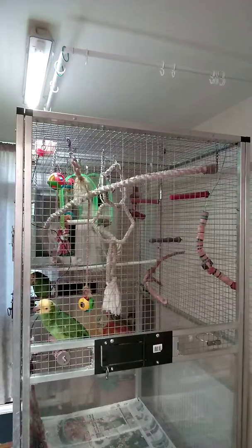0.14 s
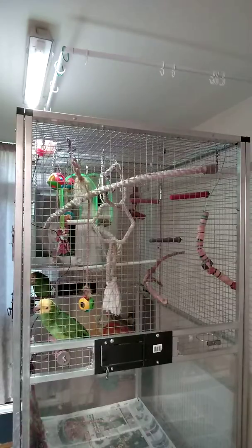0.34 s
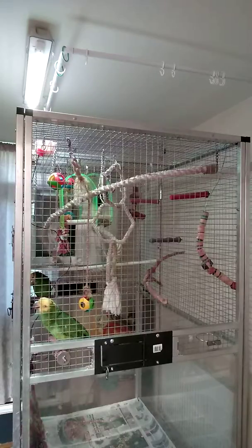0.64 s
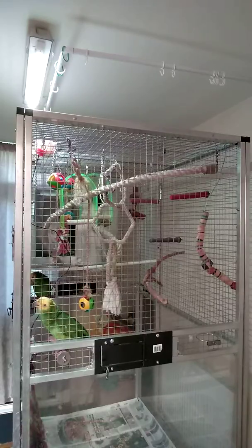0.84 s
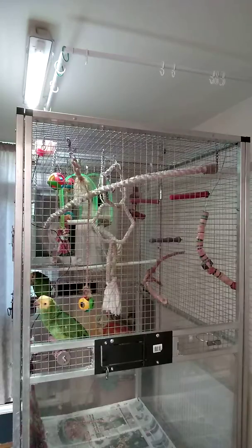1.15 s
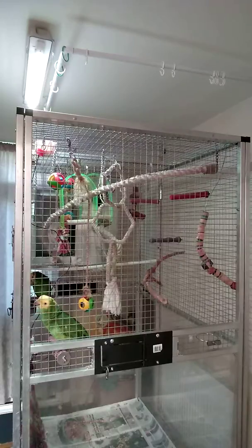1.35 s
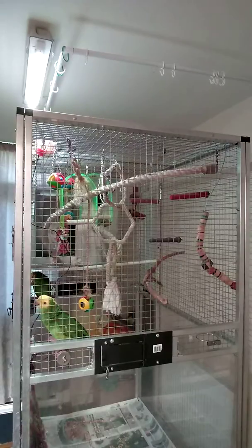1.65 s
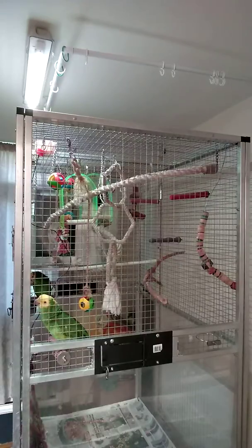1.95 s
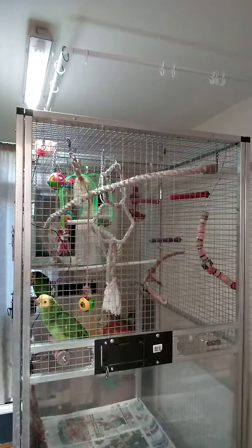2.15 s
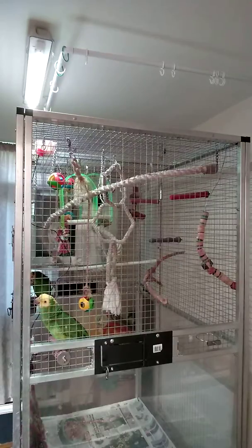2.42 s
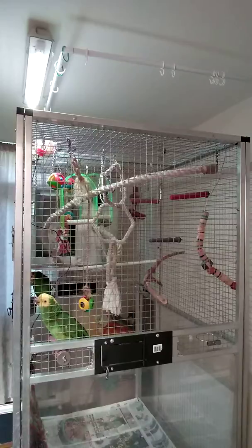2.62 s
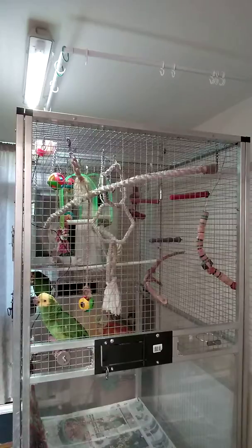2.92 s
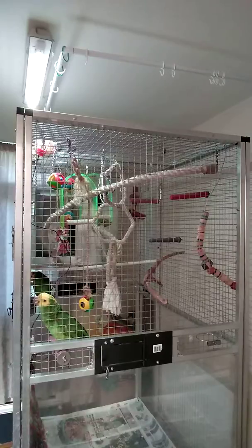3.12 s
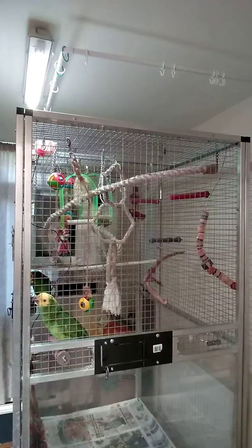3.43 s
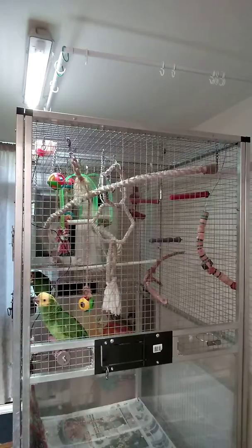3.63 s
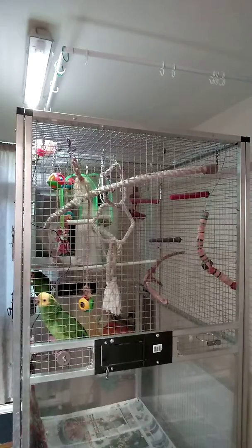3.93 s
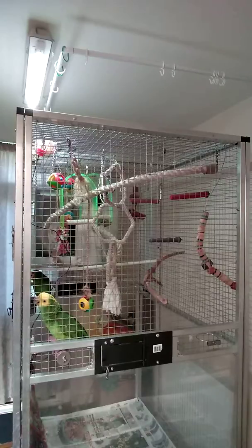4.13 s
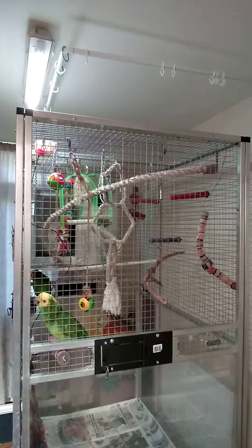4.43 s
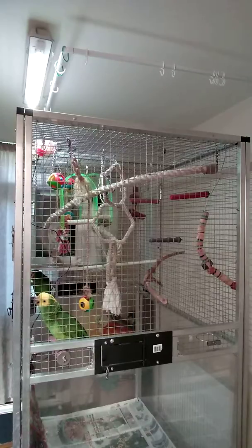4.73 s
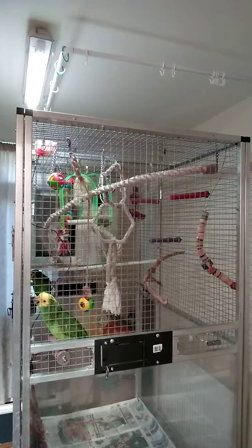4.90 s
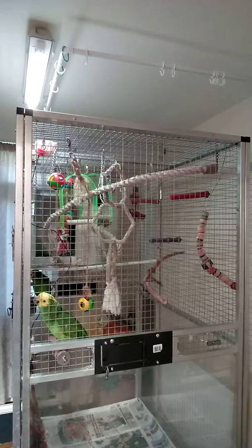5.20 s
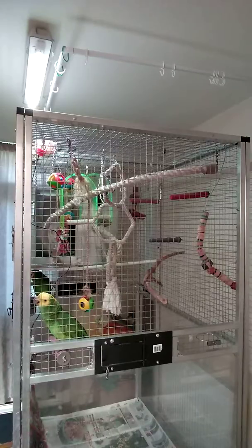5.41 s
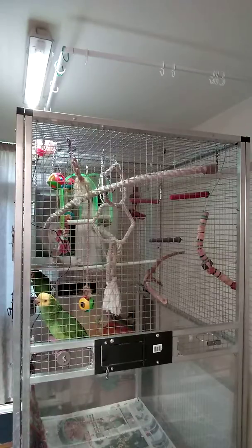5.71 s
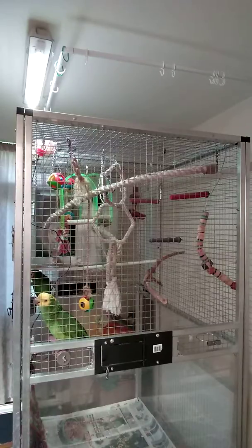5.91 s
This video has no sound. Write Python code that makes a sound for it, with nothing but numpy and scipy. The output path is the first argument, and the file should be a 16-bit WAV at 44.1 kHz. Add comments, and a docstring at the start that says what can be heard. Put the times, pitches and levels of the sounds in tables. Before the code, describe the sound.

Harsh, gliding parrot calls close to the microphone, sparse at first, then crowded and overlapping, ringing briefly off hard indoor walls.

```python
"""Two parrots in a small bare room

Two parrots squawk over each other, close to the microphone, with a clack, faint whistles and a thin hiss.
Each call is a train of syrinx pulses and turbulence, coloured by a throat and beak whose resonances move.
The clack is ringing noise, the whistles are wavering sines and the hiss is noise in narrow bands.
The room smears the glides, and a limiter holds the level nearly flat over steady coloured noise."""
import sys
import numpy as np
from scipy import signal
from scipy.fft import rfft, irfft
from scipy.io import wavfile
from scipy.ndimage import uniform_filter1d

SR = 44100
rng = np.random.default_rng(int(sys.argv[2]) if len(sys.argv) > 2 else 0)


def master(y):
    """Save y as 16-bit WAV."""
    cut = np.clip(np.atleast_2d(y).T, -1, 1)
    pcm = np.round(cut * 32767)  # scale
    wavfile.write(sys.argv[1], SR, pcm.astype(np.int16))


N = 267334

# The calls of the birds. Each row: depth of the every-third-pulse pattern, base roughness from 0 to 1,
# pitch factor of the final plunge, throat in Hz at mean pitch, throat width in Hz, beak in Hz at mean pitch,
# beak width in Hz, chest level in dB, palate level in dB, treble tilt in dB per octave, and a contour.
# Each contour row: time in seconds, pitch in Hz before the plunge, effort in dB, beak level in dB,
# treble level in dB.
CALLS = [ (0.74, 0.34, .79, 1320, 830, 2620, 1700, -22.5, -1, 6, [(0.0, 703.6, 5.5, -5, -8),
         (.034, 660, -9.5, -19, -11), (.068, 671, -5.5, -11, -14), (.1, 664, -28, -8, -15)]),
         (0.23, 0.086, 1, 1620, 960, 2900, 1400, -35, 7.5, 5.5, [(.04, 524.3, -10, -9, -6.5),
         (.11, 537.8, -14, -9, -5.5), (.222, 556, -9.5, -14, -2.5), (.272, 557, -18, 5, -4),
         (.3, 521, -4, 16, -6)]),
         (0.92, 0.217, .9, 1486, 1330, 2660, 1530, -15.5, -2, -0.5, [(.25, 556.5, -6, -20, -12),
         (.284, 515, -16, 2, -3), (.335, 583, -12.5, 2.5, -4), (.454, 574.6, -17.5, 6.5, -5),
         (.586, 564.6, -20, 0.5, -2), (.752, 591, -20.5, -1, -5), (.822, 617.5, -16, -11, -7),
         (.87, 539, -14.5, -24, -11), (.94, 381.6, -25, -2, -9.5)]),
         (.097, 0.113, 0.92, 1360, 934, 2460, 990, -54, 12.5, 6.5, [(1.175, 339.7, -21, 0.5, -14),
         (1.211, 398, -25.5, -5.5, -9.5), (1.301, 432.1, -25, -8, -10.5), (1.43, 444.6, -23, -3.5, -9.5),
         (1.58, 464.7, -13, -5, -12), (1.63, 484.2, -13, -3, -4.5), (1.74, 470.3, -13, -5, -4.5),
         (1.773, 428.5, -13, -1.5, -5.5), (1.837, 330, -21, -0.5, -7), (1.86, 325, -45, 14, -16)]),
         (0.23, 0.041, 0.98, 1346, 1100, 2330, 1100, -27, 14, 6, [(2.258, 380, -27.5, -6, -12),
         (2.306, 421.4, -27.5, -4, -11), (2.46, 449.4, -24, -2.5, -7), (2.56, 425.4, -20, -3, -15.5),
         (2.632, 393.6, -26, -16, -18), (2.734, 498.2, -15, 1.5, -0.5), (2.836, 505.2, -17.5, 0.5, -0.5),
         (2.906, 446, -13, 0.5, -9.5), (2.97, 442.6, -16.5, 16, -4)]),
         (1.8, 0.89, 1, 1300, 910, 2400, 2600, -15, 11, 1.5, [(2.48, 726, -27, -10, -14),
         (2.56, 713, -19.5, -7, -14.5), (2.68, 724, -19, -8, -8.5)]),
         (1.15, 0.706, .58, 1290, 790, 2520, 1440, -9.5, 3.5, -7.5, [(2.82, 619.6, -25, -22, -3),
         (2.854, 741.5, -11.5, 2.5, -4), (3.018, 718, -21.5, 9, -7.5), (3.05, 719, -16, -19, -23)]),
         (1.64, 0.39, 0.96, 834, 244, 2470, 1340, -31, 2, -7, [(3.08, 552, -26, 0, -5),
         (3.119, 556.2, -16.5, 3.5, -7), (3.153, 576.3, -22, 17, -2), (3.21, 576, -27, 16, -4)]),
         (1.2, 0.98, 1, 1230, 580, 2600, 1200, -21, -8, -4, [(3.292, 770, -10, -18, -18),
         (3.302, 695, 1.5, -28, -20), (3.325, 620, -21, -21, -15), (3.36, 615, -17, -19, -18)]),
         (0.77, 0.28, .9, 1105, 330, 2540, 540, -11, 1, 6, [(3.355, 559, -10, -25, -15),
         (3.379, 550.2, -4, -21.5, -13.5), (3.467, 547.3, -11, -2.5, -8.5), (3.54, 545, -17, -4, -4)]),
         (0.68, .85, 0.71, 1154, 395, 2540, 1600, -65, 8, -2.5, [(3.44, 550.8, -21, -8, -8),
         (3.51, 555, -6, -5.5, -10), (3.592, 569.6, -11, -5.5, -6.5), (3.808, 564.3, -14, -2, -3),
         (3.854, 519, -22.5, 4.5, -8), (3.9, 452, -20, -12, -3)]),
         (0.59, 0.352, 0.8, 1820, 1500, 2490, 1100, -5.5, 5, -3, [(3.93, 786, -14, -2, -11),
         (3.962, 805, -21.5, 2, -10), (3.975, 912.5, -14, 10, -8), (4.032, 901.5, -20, 10, -1),
         (4.12, 888, -23, 2, -7)]),
         (0.11, .06, .94, 1100, 2600, 2440, 940, 0.5, 5, -5.5, [(4.215, 720, -18, 9, -14),
         (4.239, 609.6, -15, 2, -4.5), (4.309, 727.6, -22.5, 8, -6.5), (4.343, 475, -12, 12, -6.5),
         (4.36, 486, -12, 18, -20)]),
         (0.14, 0.069, .94, 1300, 900, 2340, 980, 1, 1.5, -3.5, [(4.51, 660, -8, 7, -30),
         (4.526, 573.5, -14, 14.5, -11.5), (4.62, 714, -13.5, 8, -2.5), (4.642, 531.7, -11.5, 16.5, -0.5),
         (4.66, 478, -4, -3, -9)]),
         (0.35, 0.033, 0.78, 1350, 910, 2120, 1040, -10, 6, 5, [(4.675, 590, -19, -2, -12),
         (4.75, 684, -19, -1.5, -0.5), (4.79, 765, -31, -14, -2), (4.82, 755, -48, -12, -18)]),
         (0.013, 0.032, .7, 1870, 1690, 2620, 940, -12, -18, -1.5, [(4.822, 733, -17, -8, -8),
         (4.832, 704, -11, -2, -5.5), (4.858, 583.6, -9.5, 8, -7.5), (4.918, 530.8, -14, -2, -21),
         (5.014, 641.5, -10, 2.5, -8), (5.108, 627.5, -21.5, 3, 3.5), (5.146, 595.2, -9, -1, -13),
         (5.214, 610.4, -15, 0, -7.5), (5.276, 645.4, -11.5, -3.5, -7), (5.342, 666.6, -13.5, -1.5, -9),
         (5.476, 604, -15.5, -25, -8), (5.5, 591, -3, 9.5, -16)]),
         (0, 0.067, .78, 1590, 980, 3200, 2600, -17.5, 0, 5, [(4.86, 737, -9, -20, 2.5),
         (4.914, 670, -14, 4, -7.5), (4.982, 730, -15.5, -10, -2), (5.092, 738, -16.5, -11, -5),
         (5.13, 654, 1, -19, -16)]),
         (0, 0.22, 0.98, 1180, 990, 3220, 1030, -23, 7, 5.5, [(5.746, 510.7, -6.5, -11, -28),
         (5.767, 450, -23.5, -2, -2), (5.8, 432, -40, -9, -1)]),
         (0.56, 0.63, 1, 1390, 1480, 2920, 1300, -8.5, 6.5, 5.5, [(5.922, 496, -34, -17, -26),
         (5.94, 472, -8.5, -7, -10.5), (5.968, 492.5, -14, -3.5, -8), (6.062, 417, -10, -5, -12.5)]), ]
# Beak clacks. Each row: start in seconds, level in dB, ring in Hz.
BEAK_CLACKS = [(4.032, -10.5, 755)]
# Faint whistles in the pauses. Each row: start in seconds, length in seconds, mean pitch in Hz, level in dB.
FAINT_WHISTLES = [(1.035, 0.11, 2240, -47), (2.015, 0.099, 1707, -61), (2.15, 0.11, 2230, -69)]
# Windpipe overtones. Each row: centre in Hz, width in Hz, level in dB before the tilt of the call.
WINDPIPE_OVERTONES = [(5280, 1700, 2.5), (6536, 1100, 4.5), (7370, 1900, 0.5), (9840, 2500, -10.5),
                      (11600, 2100, -13.5), (14400, 5900, -21)]
# Bands of the thin hiss. Each row: centre in Hz, width in Hz, relative level in dB.
THIN_HISS_BANDS = [(6250, 300, -8), (7400, 410, 8), (8350, 350, 17), (9500, 680, 11), (10650, 480, 9)]
# Decay of the room. Each row: frequency in Hz, time to fall by 60 dB in seconds.
ROOM_DECAY = [(250, 0.34), (660, 0.38), (1740, 0.3), (4590, 0.27), (12000, 0.28)]
# Spectrum of room and microphone noise. Each row: frequency in Hz, relative density in dB per Hz.
NOISE_SPECTRUM = [(25, -14), (150, -23), (230, -8.5), (390, -3), (700, -9), (2250, -8.5), (4900, -21),
                  (15500, -25)]

CHEST_HZ, CHEST_WIDTH_HZ = 724, 572  # low resonance under the throat
PALATE_HZ, PALATE_WIDTH_HZ = 3670, 1150  # resonance between beak and windpipe overtones
THROAT_FOLLOW, BEAK_FOLLOW = 0.65, 0.46  # exponents by which the resonances ride with the pitch
PULSE_TOP_HZ = 8200  # above this the pulse harmonics fade
PLUNGE_S = .035  # the folds slacken as a call ends
ATTACK_S, RELEASE_S = 0.013, .015
ROUGH_PER_SAG = .35  # roughness gained as the pitch sags below the top of the call
ROUGH_PER_DB, FIRM_DB = .008, -15  # roughness gained per dB of effort below a firm voice
HISS_PEAK_S, HISS_DB, HISS_RISE_DB_PER_S, HISS_FALL_DB_PER_S = 2.124, -58, 130, 350
ROOM_DB = 2  # reverberant gain relative to the direct sound
NOISE_DB = -53.5  # rms level of the noise ahead of the limiter
EDGE_HZ = 15680  # upper band limit


def amp(db):
    """Level: the amplitude ratio is ten to the power of dB / 20."""
    return 10 ** (np.asarray(db) / 20)


def evened(x):
    """Normalization: division by the rms brings the mean power to 1."""
    return x / np.sqrt(np.mean(x ** 2) + 1e-20)


def steadied(x, size=1500):
    """Running normalization: division by a moving rms holds the short-term power near 1."""
    return x / np.sqrt(uniform_filter1d(x ** 2, size, mode="reflect") + 1e-12)


def read(points, hz):
    """Interpolation: values are joined by straight lines on a log-frequency axis."""
    f, value = np.transpose(points)
    return np.interp(np.log(hz + 1), np.log(f + 1), value)


def add(mix, s, sound):
    """Superposition: a sound is summed into the mix at s seconds."""
    part = mix[max(round(s * SR), 0):][:len(sound)]
    part += sound[:len(part)]


def resonate(x, hz, width, count=1):
    """Heterodyne resonance: the curve hz is shifted to zero, smoothed count times and shifted back."""
    turn = np.exp(2j * np.pi * np.cumsum(hz * np.ones(len(x))) / SR)
    r = np.exp(-np.pi * width / SR)
    z = x / turn
    for _ in range(count):
        z = signal.lfilter([1 - r], [1, -r], z)
    return 2 * (turn * z).real


def ring(x, hz, width):
    """Fixed resonance: a two-pole peak filter has gain 1 at its centre."""
    return signal.lfilter(*signal.iirpeak(hz, hz / width, SR), x)


def syrinx(hz, rough, third):
    """Source excitation: jittered harmonic pulses and gated turbulence share the drive by roughness."""
    wobble, breath, grip = rng.standard_normal((len(hz), 3)).T
    jitter = (0.0015 + 0.0402 * rough) * evened(uniform_filter1d(wobble, size=200))
    slow_waver = uniform_filter1d(uniform_filter1d(grip, size=1500), size=1500)
    jitter += 0.01497 * rough * evened(slow_waver)
    turns = np.cumsum(hz * (1 + jitter)) / SR

    pulses = sum(np.cos(2 * np.pi * k * turns) / (1 + (k * hz / PULSE_TOP_HZ) ** 4) for k in range(1, 28))
    pulses = pulses * (1 + third * np.cos(2 * np.pi * turns / 3 + 1))
    # a rough voice catches and slips
    pulses = pulses * amp(6.2 * rough * evened(uniform_filter1d(grip, size=400)))

    # turbulence bursts at each opening and comes in rasping clumps
    puffs = (1.4 + np.exp(-(turns % 1) / 0.12)) * breath
    puffs *= amp(7.9 * evened(uniform_filter1d(wobble, size=350)))
    drive = np.sqrt(1 - rough ** 2) * evened(pulses) + rough * evened(puffs)
    airy = drive + (0.037 + 2.0 * rough) * evened(puffs)  # extra turbulence for the treble
    return drive, airy


def windpipe(airy, palate_db, tilt_db):
    """Modal superposition: palate and windpipe resonances add with alternating signs."""
    modes = [(PALATE_HZ, PALATE_WIDTH_HZ, palate_db)]
    lowest_hz = WINDPIPE_OVERTONES[0][0]
    for hz, width, db in WINDPIPE_OVERTONES:
        modes.append((hz, width, db + tilt_db * np.log2(hz / lowest_hz)))
    return sum((-1) ** k * amp(db) * ring(ring(airy, f, w), f, w) for k, (f, w, db) in enumerate(modes))


def squawk(third, rough, plunge, throat_hz, throat_width_hz, beak_hz, beak_width_hz,
           chest_db, palate_db, tilt_db, rows):
    """Source and filter: syrinx drive passes a moving throat and beak, a fixed chest and a windpipe."""
    s, *columns = np.transpose(rows)
    t = np.arange(s[0], s[-1], 1 / SR)
    hz, effort_db, beak_db, treble_db = (np.interp(t, s, c) for c in columns)
    relative_pitch = hz / hz.mean()
    throat_hz = throat_hz * relative_pitch ** THROAT_FOLLOW
    beak_hz = beak_hz * relative_pitch ** BEAK_FOLLOW

    slack = np.clip(1 - (s[-1] - t) / PLUNGE_S, 0, 1) * (1 - min(plunge, 1))
    sag = 1 - hz / hz.max()
    weakness_db = np.clip(FIRM_DB - effort_db, 0, 15)
    rough = np.clip(rough + ROUGH_PER_SAG * sag + ROUGH_PER_DB * weakness_db + slack, 0, 1)
    drive, airy = syrinx(hz * (1 - slack), rough, third)

    throat = steadied(resonate(drive, throat_hz, throat_width_hz, count=3))
    chest = amp(chest_db) * steadied(resonate(drive, CHEST_HZ, CHEST_WIDTH_HZ, count=3))
    beak = amp(beak_db) * steadied(resonate(drive, beak_hz, beak_width_hz, count=3))
    treble = amp(treble_db) * steadied(windpipe(airy, palate_db, tilt_db))
    voice = steadied(throat - chest - beak) + treble
    edges = np.clip(np.minimum((t - s[0]) / ATTACK_S, (s[-1] - t) / RELEASE_S), 0, 1)
    return s[0], amp(effort_db) * edges * voice


def clack(s, level_db, hz):
    """Impact and free decay: a short band of noise dies away beside a decaying hollow ring."""
    t = np.arange(round(.03 * SR)) / SR
    noise = ring(ring(rng.standard_normal(len(t)), 1570, 2100), 1700, 2200)
    tick = evened(noise) * np.exp(-t / 0.0057)
    hollow = np.sin(2 * np.pi * hz * t) * np.exp(-t / 0.0037)
    return s, amp(level_db) * (2.66 * tick + hollow)


def whistle(s, length, hz, level_db):
    """Frequency modulation: smoothed noise wavers a sine slightly, and its ends are soft."""
    t = np.arange(0, length, 1 / SR)
    waver = 1 + 0.01 * evened(uniform_filter1d(rng.standard_normal(len(t)), size=600))
    tone = np.sin(2 * np.pi * np.cumsum(hz * waver) / SR)
    return s, amp(level_db) * tone * signal.windows.tukey(len(t), .6)


def hiss():
    """Band-filtered noise: a few high narrow bands swell and fade exponentially."""
    t = np.arange(-SR // 10, SR // 10) / SR
    noise = rng.standard_normal(len(t))
    bands = sum(amp(db) * resonate(noise, f, w, count=2) for f, w, db in THIN_HISS_BANDS)
    level_db = HISS_DB + np.minimum(HISS_RISE_DB_PER_S * t, -HISS_FALL_DB_PER_S * t)
    return HISS_PEAK_S + t[0], amp(level_db) * evened(bands) * np.hanning(len(t)) ** .5


def room(x):
    """Reverberation: sparse taps of random sign, each band dying at its own speed, convolve the sound."""
    taps = np.zeros(SR)
    at = np.arange(200, SR - 20, 20)  # one tap in every 20 samples
    taps[at + rng.integers(0, 20, len(at))] = rng.choice([-1., 1.], len(at))
    hz, t, z = signal.stft(taps, SR, nperseg=256)
    decay = amp(-60 * t / read(ROOM_DECAY, hz)[:, None])
    tail = signal.istft(z * decay, SR, nperseg=256)[1]
    return signal.fftconvolve(x, tail / np.linalg.norm(tail))[:N]


def air():
    """Stationary noise: white noise is shaped in the spectrum into a steady coloured floor."""
    hz = np.fft.rfftfreq(N, 1 / SR)
    spectrum = rfft(rng.standard_normal(N)) * amp(read(NOISE_SPECTRUM, hz))
    return amp(NOISE_DB) * evened(irfft(spectrum, N))


def scene():
    """Direct and reverberant fields: all sources and their room add up, alike in both channels."""
    birds = np.zeros(N)
    for call in CALLS:
        add(birds, *squawk(*call))
    for row in BEAK_CLACKS:
        add(birds, *clack(*row))
    for row in FAINT_WHISTLES:
        add(birds, *whistle(*row))
    add(birds, *hiss())
    return np.tile(birds + amp(ROOM_DB) * room(birds), (2, 1))


def record(dry):
    """Dynamic compression: bass cut and noise, then limiter, soft saturation, bass cut and band limit."""
    bass_cut = signal.butter(4, 330, "high", fs=SR, output="sos")
    heard = amp(3.0) * signal.sosfilt(bass_cut, dry) + air()

    power_db = 10 * np.log10(uniform_filter1d((heard ** 2).mean(0), size=300) + 1e-12)
    fall = np.arange(N) * 54.7 / SR  # recovery in dB a second
    held_peak_db = np.maximum.accumulate(power_db + fall) - fall
    over_db = np.maximum(held_peak_db + 14.5, 0)  # excess over a threshold of -14.5 dB
    held = heard / amp(0.85 * uniform_filter1d(over_db, size=400))
    held = .95 * np.tanh(held / .95)

    held = signal.sosfilt(signal.butter(1, 110, "high", fs=SR, output="sos"), held)
    band_limit = signal.firwin(1535, EDGE_HZ, window=("kaiser", 9), fs=SR)
    return signal.oaconvolve(held, band_limit[None], "same")


dry = scene()
out = record(dry)
master(out)
```